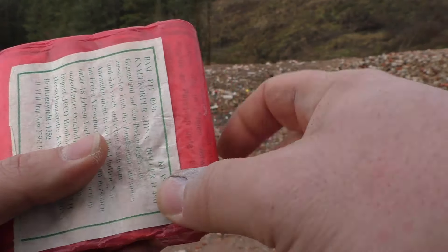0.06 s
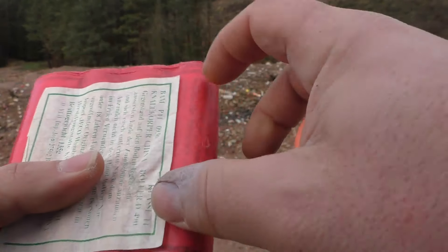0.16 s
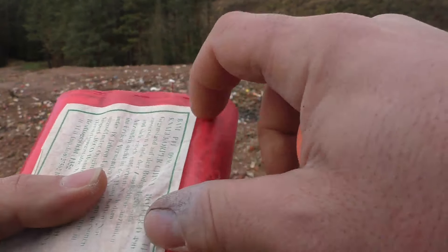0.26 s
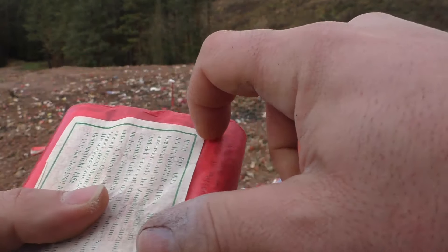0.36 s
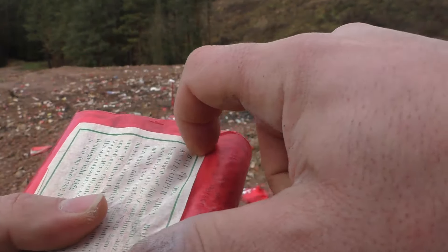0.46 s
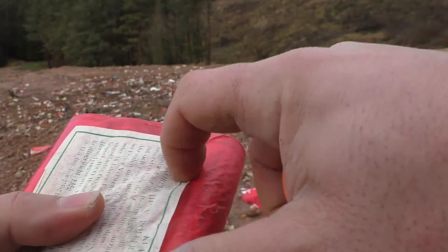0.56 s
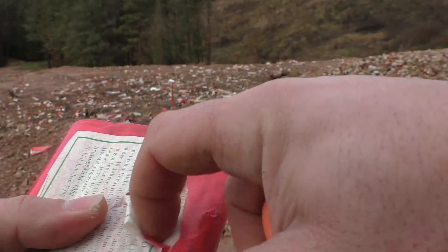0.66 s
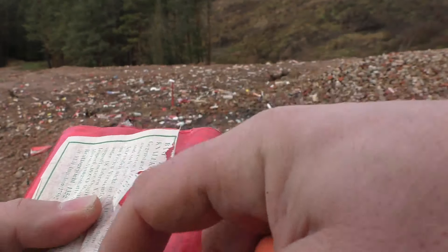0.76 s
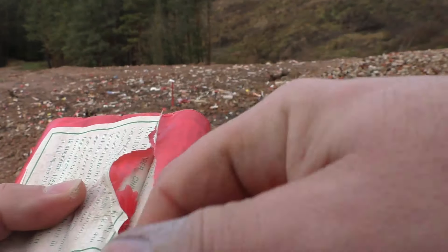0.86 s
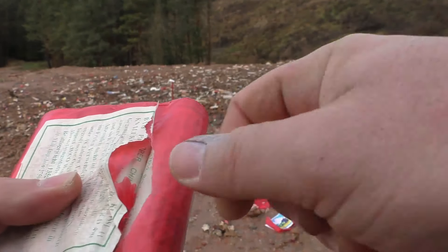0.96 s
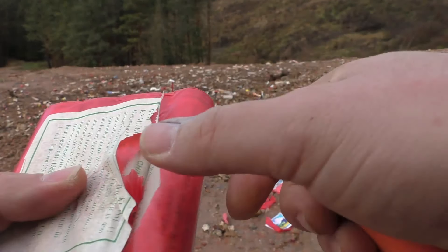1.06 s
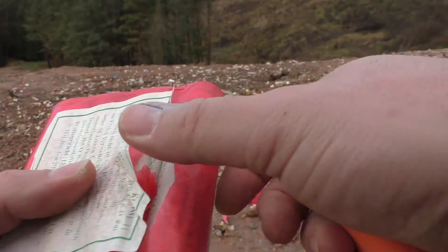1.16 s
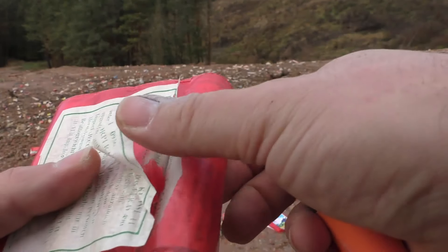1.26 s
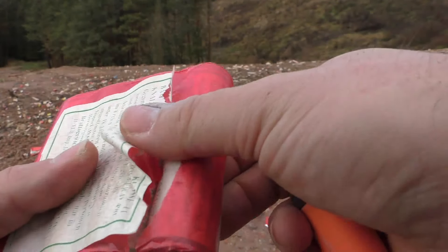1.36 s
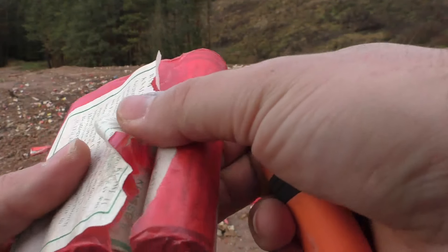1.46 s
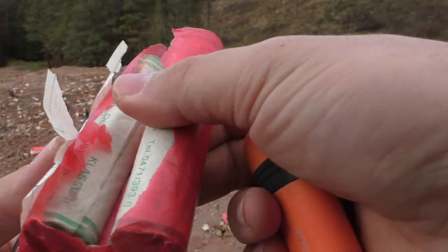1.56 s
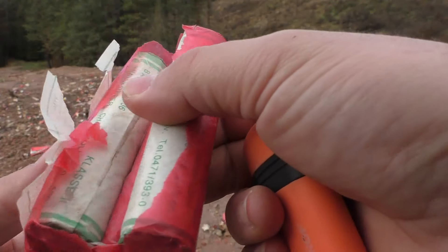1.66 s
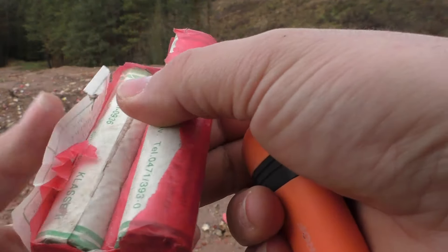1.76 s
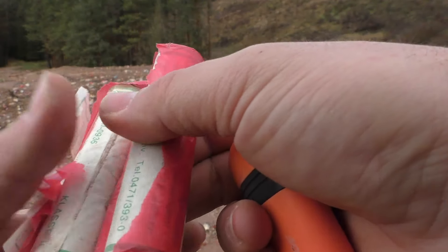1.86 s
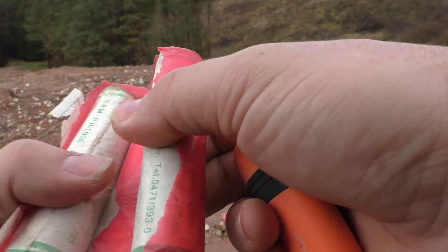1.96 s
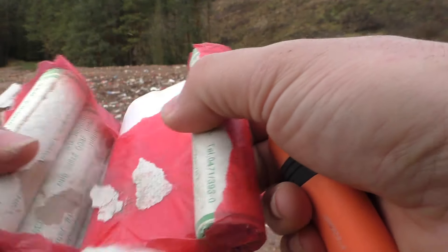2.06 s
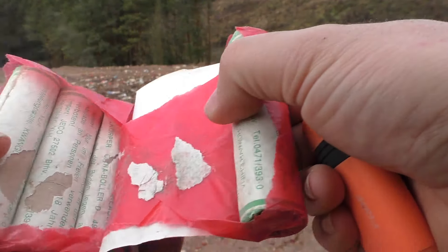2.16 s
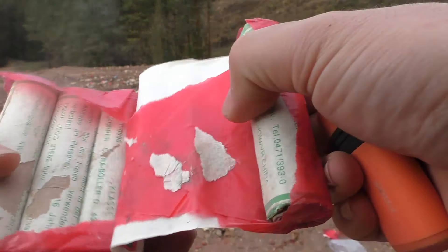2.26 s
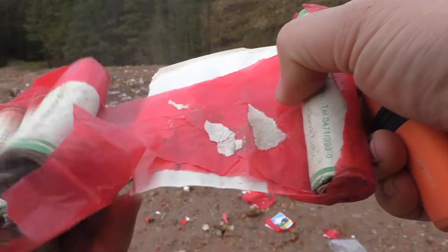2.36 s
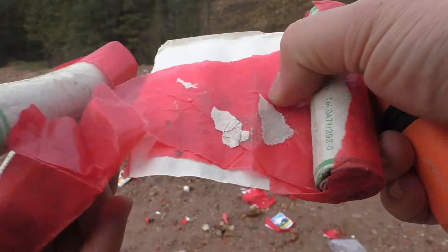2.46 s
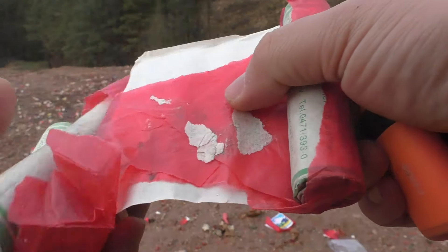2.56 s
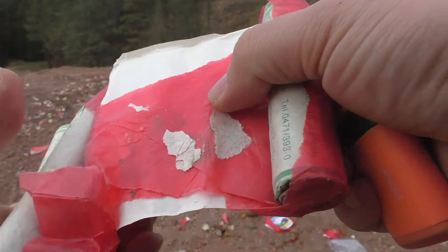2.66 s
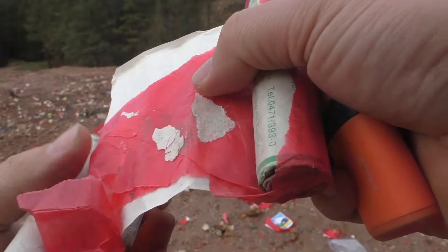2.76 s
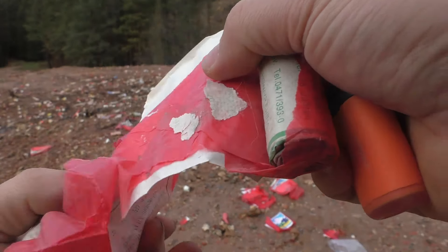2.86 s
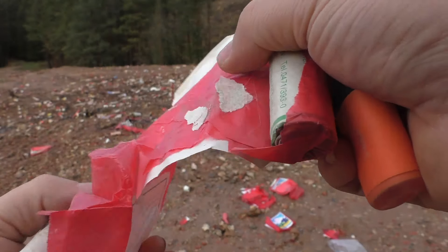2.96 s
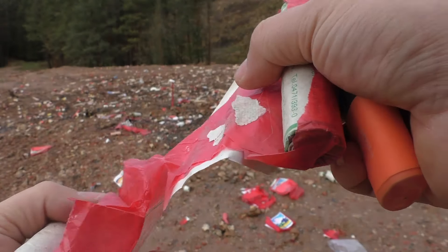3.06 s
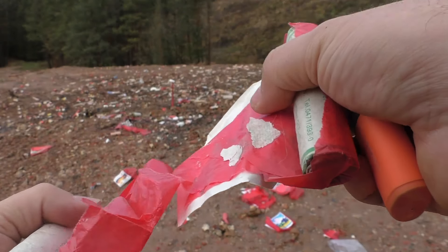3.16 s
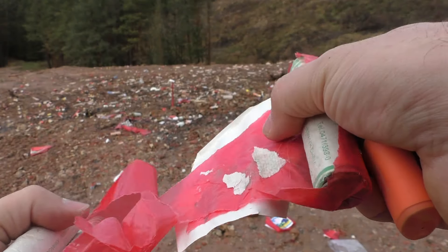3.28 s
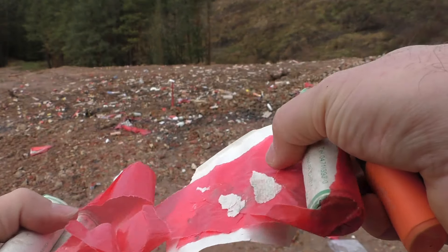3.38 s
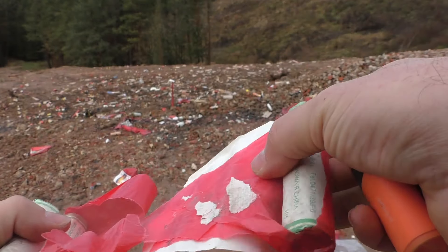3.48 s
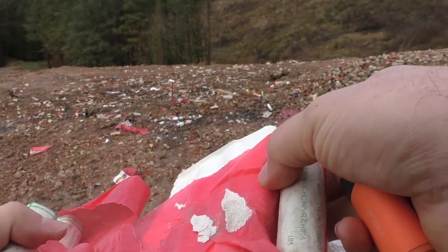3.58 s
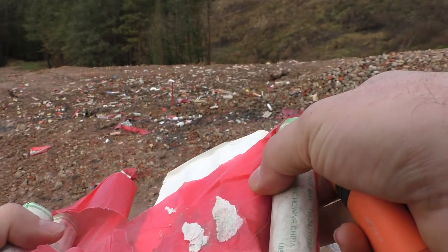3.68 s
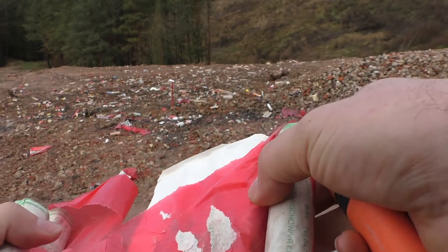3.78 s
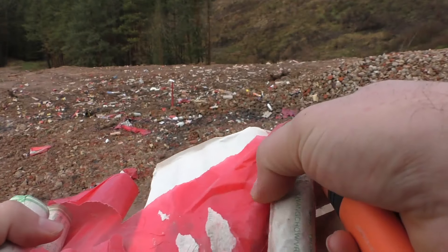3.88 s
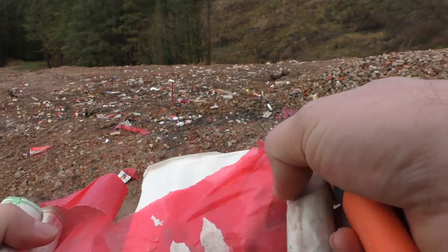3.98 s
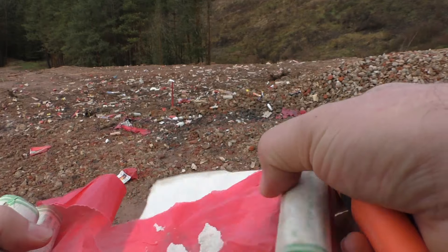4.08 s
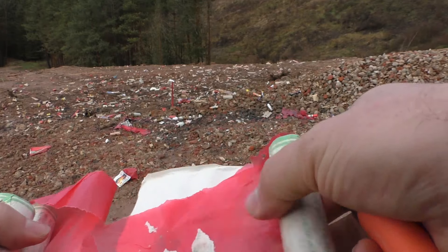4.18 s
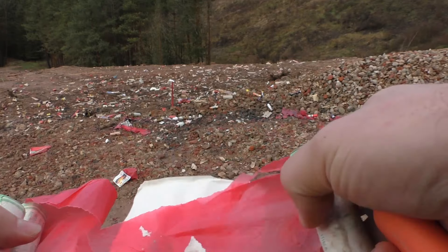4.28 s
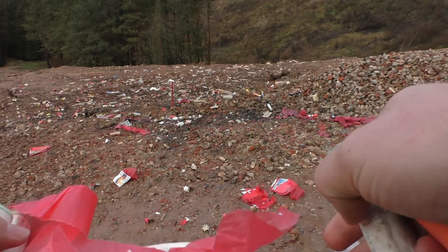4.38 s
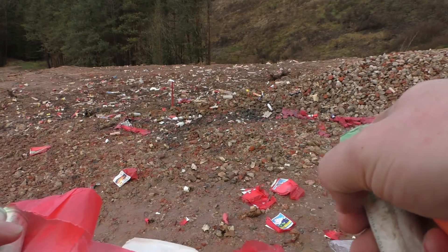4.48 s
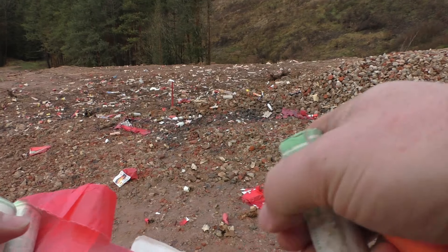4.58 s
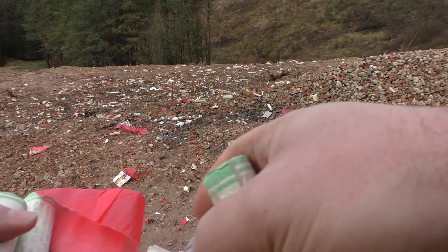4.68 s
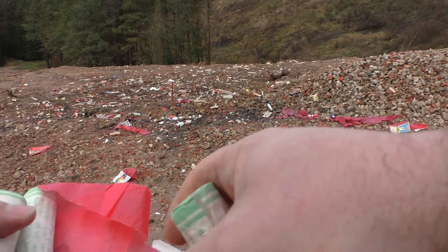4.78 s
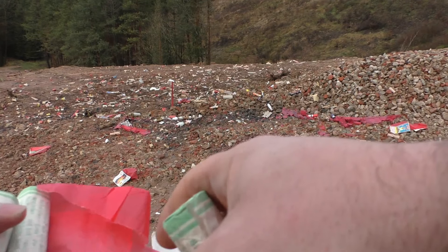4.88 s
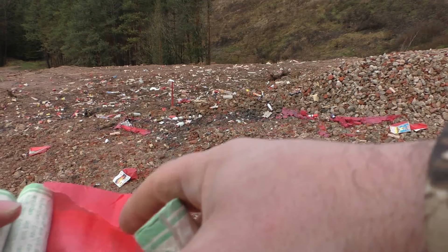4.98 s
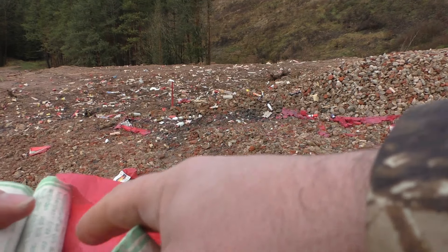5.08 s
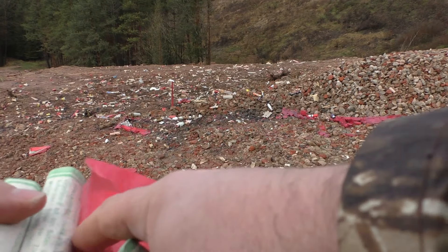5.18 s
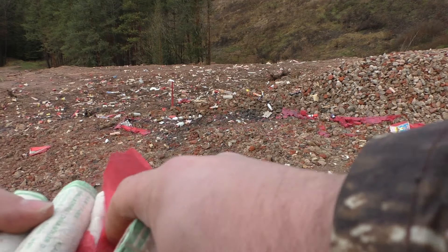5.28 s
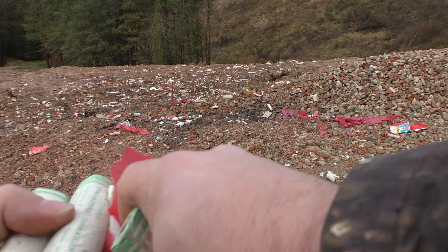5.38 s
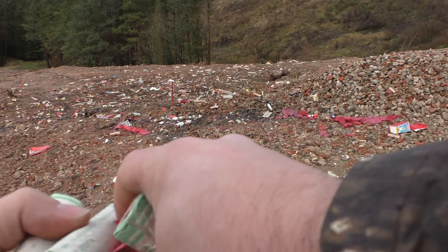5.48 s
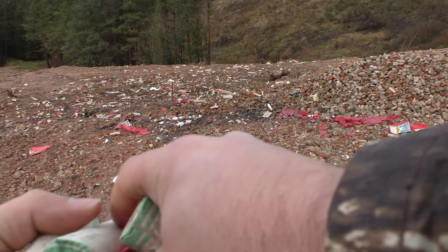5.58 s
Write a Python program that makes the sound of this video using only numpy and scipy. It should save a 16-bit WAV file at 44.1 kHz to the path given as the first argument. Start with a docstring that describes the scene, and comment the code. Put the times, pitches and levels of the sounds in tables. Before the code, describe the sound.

Hands rip crinkly paper from small card tubes in uneven bursts, loudest around two seconds, over a faint low open-air rumble.

```python
"""Paper wrapper torn off card tubes

Outdoors, hands tear and crumple a thin paper wrapper off a bundle of card tubes, close to a small stereo microphone.
Fibres and creases snap: clumped showers of clicks and noise patters, shaped by the swell and fade of each pull.
The sheet pops and flaps below them: slower showers in lower bands; damped sines knock and thump.
Behind lies a low rumble of open air: noise shaped in frequency, partly alike in both channels."""
import sys
import numpy as np
from scipy import signal
from scipy.fft import rfft, irfft, next_fast_len
from scipy.io import wavfile
from scipy.ndimage import uniform_filter1d

SR = 44100
rng = np.random.default_rng(int(sys.argv[2]) if len(sys.argv) > 2 else 0)


def store_pcm(level_fs):
    """Save levels as 16-bit WAV."""
    pcm = np.round(np.clip(level_fs, -1, 1) * 32767).astype(np.int16)
    wavfile.write(sys.argv[1], SR, np.atleast_2d(pcm).T)


N = 248283  # samples


def gain_of(db):
    """Decibels to an amplitude factor."""
    return 10 ** (np.asarray(db) / 20)


def evened(x):
    """Scales to rms 1."""
    return x / np.sqrt(np.mean(x ** 2) + 1e-20)


def read(points, hz):
    """Reads a spectral table on a log-frequency axis."""
    f, value = np.transpose(points)
    return np.interp(np.log(hz + 1), np.log(f + 1), value)


def colour(points):
    """Causal, minimum-phase impulse response of a spectrum, energy 1, so only the table's shape counts."""
    hz = abs(np.fft.fftfreq(4096, 1 / SR))
    log_gain = np.log(gain_of(np.maximum(read(points, hz), -70)))
    phase = -signal.hilbert(log_gain).imag
    taps = np.fft.ifft(np.exp(log_gain + 1j * phase)).real[:2048]
    return taps / np.linalg.norm(taps)


def wander(seconds):
    """Random drift that changes over the given time, rms 1."""
    width = max(round(seconds * SR), 2)
    drift = uniform_filter1d(rng.standard_normal(N), width)
    return evened(uniform_filter1d(drift, width))


def add(mix, s, sound):
    """Mixes a sound in at a time in seconds, cut at the end of the mix."""
    part = mix[round(s * SR):][:len(sound)]
    part += sound[:len(part)]


# open air behind the paper, spectral shape: (f/Hz, relative level/dB)
AIR_SPECTRUM = [(15, -36), (25, -5), (76, 11), (309, -4.5), (373, -0.5), (416, -9), (1520, -16),
                (3340, -38), (7920, -99.5), (16000, -113)]
# likeness of the air at left and right: (f/Hz, correlation, limited to -1..1)
AIR_LIKENESS = [(60, 0.82), (240, 0.7), (950, 0.17), (3770, -1.1), (15000, -0.08)]
# lean of the stereo microphone, for air and paper alike: (f/Hz, left minus right level/dB)
PORT_LEAN = [(60, 1.5), (150, 2.8), (300, 1.5), (700, .5), (8000, .7), (15000, -.2)]
AIR_DB = -49  # rms over both channels


def air():
    """Distant rumble: noise spectra that swell gently in patches of time and frequency."""
    frames, hz = N // 256 + 5, np.fft.rfftfreq(1024, 1 / SR)
    a, b, c, d, patches = rng.standard_normal((frames, 513, 5)).T
    patches = uniform_filter1d(patches, 10, axis=0)
    patches = evened(uniform_filter1d(patches, 16, axis=1))
    same = np.clip(read(AIR_LIKENESS, hz), -1, 1)[:, None]
    left, stranger = a + 1j * b, c + 1j * d
    right = same * left + np.sqrt(1 - same ** 2) * stranger
    lean_db = np.multiply.outer([.5, -.5], read(PORT_LEAN, hz))[..., None]
    spectra = np.array([left, right])
    spectra *= gain_of(read(AIR_SPECTRUM, hz)[:, None] + 0.8 * patches + lean_db)
    sound = signal.istft(spectra, nperseg=1024, noverlap=768)[1][:, :N]
    return gain_of(AIR_DB) * evened(sound)


# fingers never quite rest on the paper: (t/s, crackle level/dB)
FIDGETING = [(0, -66), (0.5, -59), (0.9, -65.5), (1.15, -58), (1.35, -59), (1.6, -56.5), (1.825, -66),
             (2.6, -47), (3.15, -55), (4.3, -62), (4.65, -51.5), (5.08, -55), (5.3, -49), (5.63, -56)]
FIDGET_POP_DB, FIDGET_FLAP_DB, FIDGET_RIP_DB = 9, 0.5, -24  # relative to its crackle
# pulls of the hands: (full strength t/s, swell/s, hold/s, fade/s, crackle level/dB,
#                      sheet pops above crackle/dB, tearing from 0 crumple to 1 rip)
HAND_PULLS = [(0.031, 0.064, 0.01, 0.12, -37, -5, 0.44), (0.15, .05, 0.0047, .03, -48.5, -4, 1),
              (0.304, 0.064, 0.026, 0.2, -37.5, -2, 0.94), (0.492, .03, 0.038, 0.037, -49, 1, 1),
              (0.587, 0.034, 0.11, 0.14, -23.5, -11.5, 0.55), (1.385, 0.0084, 0.11, 0.027, -39, 0, 1),
              (1.536, 0.035, 0.013, .045, -24.5, -6.5, 0.86), (1.724, 0.24, 0.024, 0.071, -43.5, 4.5, 1),
              (1.865, .025, .05, 0.033, -44.5, 2, 0.65), (1.968, 0.056, 0.065, 0.021, -24, 3, 0.86),
              (2.042, 0.029, 0.075, 0.067, -18, 3.5, 0.53), (2.186, 0.045, 0.0092, 0.054, -29.5, 0.5, 0),
              (2.283, 0.031, 0.075, 0.18, -20, 0, 0.15), (2.49, 0.22, 0, 0.39, -29, 2, 0.3),
              (2.838, .11, 0.022, 0.16, -33.5, 5.5, 0.64), (3.098, 0.6, 0, 0.032, -45, 7.5, .5),
              (3.29, 0.18, 0, 0.12, -36, 2.5, 0.26), (3.4, 0.037, 0.0027, 0.069, -35.5, 1, 0.27),
              (3.51, 0.1, 0, 0.64, -31, 0.5, 0.32), (3.7, 0.061, 0.00099, 0.027, -37.5, 6, 0.012),
              (3.764, 0.011, 0.022, .02, -29.5, -8.5, 0), (3.856, 0.054, 0.078, 0.02, -31, 0.5, 0.11),
              (3.924, .015, 0.025, 0.24, -21.5, 1.5, 0.18), (4.109, 0.12, 0.019, 0.13, -32, 2.5, 0.39),
              (4.23, 0.071, 0.019, 0.16, -27, 0.5, 0.22), (4.69, 0.074, 0, 0.034, -45.5, 10, 0.067),
              (4.78, 0.47, 0.084, 0.5, -51, 6.5, 0), (4.99, 0.043, 0.0069, 0.023, -42, 11.5, 0.15),
              (5.166, 0.03, 0.018, 0.044, -35, 6, 0.24), (5.24, .08, .01, .08, -36, 4.5, 0.5),
              (5.342, 0.11, 0.012, 0.084, -34.5, 1.5, 0.32), (5.407, .05, 0.019, 0.035, -37, 4.5, 0.2),
              (5.45, 0.033, 0.024, 0.066, -32.5, 1, 0.41), (5.553, 0.11, 0.02, 0.046, -42.5, 7.5, 0.26),
              (5.63, 0.017, 0, .05, -32, 8.5, 0.86)]
SLOPE_DB = 20  # the crackle climbs this much in one swell time and drops it in one fade time
SHEET_FOLLOWS = 0.99  # panels and flaps swell and fade almost exactly as steeply as the fibres
FLAP_DB, RIP_DB = (-4.5, -21), (-11, 2.5)  # flaps above pops, rip above crackle: (crumpling, tearing)


def strength():
    """Envelopes of crackle, pops, flaps and rip: pulls swell, hold and fade; the loudest pull or the fidgeting rules."""
    t = np.arange(0, N + 64, 64)[:, None] / SR
    s, swell, hold, fade, pull_db, pop_db, tear = np.transpose(HAND_PULLS)
    early, late = np.maximum(s - t, 0), np.maximum(t - s - hold, 0)
    drop_db = SLOPE_DB * (early / swell + late / fade)
    flap_db, rip_db = (crumple + (rip - crumple) * tear for crumple, rip in (FLAP_DB, RIP_DB))
    crackle_db = pull_db - drop_db
    sheet_db = pull_db + pop_db - SHEET_FOLLOWS * drop_db
    layers_db = (crackle_db, sheet_db, sheet_db + flap_db, crackle_db + rip_db)
    idle_db = np.interp(t[:, 0], *np.transpose(FIDGETING))
    envelopes = []
    for db, above_db in zip(layers_db, (0, FIDGET_POP_DB, FIDGET_FLAP_DB, FIDGET_RIP_DB)):
        gain = gain_of(np.maximum(db.max(1), idle_db + above_db))
        envelopes.append(np.interp(np.arange(N) / SR, t[:, 0], gain)[:, None])
    return envelopes


def shower(per_s, spread_db, clump_db, rattle_s, count):
    """Clicks of uneven size, clumped in time; each of the count places on the sheet rattles in its own way."""
    size = gain_of(spread_db * np.minimum(rng.exponential(1, N), 4.5))
    size = size * (rng.random(N) < per_s / SR)
    size = size * gain_of(clump_db * wander(0.0048) + clump_db * wander(0.02))
    # level out the slow swells so that the crackle stays fairly steady
    local_power = uniform_filter1d(uniform_filter1d(size ** 2, 1500), 1500)
    size = size / (local_power + 1e-3 * local_power.mean()) ** .4
    place, t = rng.integers(0, count, N), np.arange(600) / SR
    rattle = rng.standard_normal((count, 600)) * np.exp(-t / rattle_s)
    rattle /= np.linalg.norm(rattle, axis=1, keepdims=True)
    places = [signal.oaconvolve(size * (place == k), rattle[k])[:N] for k in range(count)]
    return evened(np.array(places).T) / np.sqrt(count)


def rubbing():
    """Skin sliding on paper: dull, unsteady noise at one of the six places."""
    rub = rng.standard_normal((N, 1)) * gain_of(10.0 * wander(0.006))[:, None]
    rub = rub * np.eye(6)[3]
    return signal.lfilter(*signal.butter(2, 8000, fs=SR), rub, axis=0)


TICK_EVERY_S = .025  # one tick at a random moment of each such slot
TICK_DB, TICK_SPREAD_DB = -2.5, 1  # offset, plus or minus the spread
TICK_FOLLOWS = 0.76  # below 1, so ticks stand out most in light handling
TICK_T60_S = 0.0043  # times 0.5 to 1.5, before the shortest snap time applies


def ticks(crackle):
    """Lesser creases: they let go at uneven moments, harder the harder the paper is worked."""
    slots = np.arange(0, N / SR - TICK_EVERY_S, TICK_EVERY_S)
    when, size, ring = rng.random((len(slots), 3)).T
    s = slots + TICK_EVERY_S * when
    crackle_db = 20 * np.log10(crackle[(s * SR).astype(int), 0])
    db = TICK_FOLLOWS * crackle_db + TICK_DB + TICK_SPREAD_DB * (2 * size - 1)
    return list(zip(s, db, TICK_T60_S * (.5 + ring)))


# single creases that give way: (t/s, rms level at its height/dB, dying time t60/s, at least 0.004)
CREASE_SNAPS = [(0.0227, -23, 0.011), (0.0552, -25.5, 0.012), (0.0993, -40, 0.0066), (0.1282, -34, 0.012),
                (0.168, -32.5, 0.0073), (0.201, -23.5, 0.0035), (0.264, -27, 0.0047),
                (0.3085, -21.5, 0.012), (0.332, -26, 0.0066), (0.361, -33, .011), (0.3844, -20, 0.0039),
                (0.3993, -22.5, 0.0047), (0.4148, -25.5, .012), (0.4446, -26.5, 0.0099),
                (0.4894, -22.5, .0075), (0.499, -25, 0.0065), (0.5077, -30, 0.02), (0.5277, -33, 0.0091),
                (0.5701, -12.5, 0.013), (0.5873, -15.5, .013), (0.613, -16.5, 0.036), (0.636, -13, 0.0078),
                (0.6534, -21, 0.036), (0.6742, -33, 0.046), (0.6993, -28, 0.052), (0.7424, -19, 0.15),
                (0.7659, -25, .042), (0.78, -27, 0.13), (0.8182, -26, 0.04), (0.8415, -29, .008),
                (0.8595, -32, 0.004), (0.8893, -35, 0.024), (0.977, -48.5, 0.011), (1.007, -50, .006),
                (1.0293, -36, .008), (1.0648, -30, 0.0051), (1.0857, -38, .008), (1.1042, -31, 0.0039),
                (1.1553, -44, 0.0061), (1.177, -44, 0.0053), (1.184, -31.5, 0.0054), (1.2085, -26, 0.0077),
                (1.2342, -28, 0.006), (1.253, -39, 0.0068), (1.307, -27.5, 0.0071), (1.342, -37, .017),
                (1.3735, -29, 0.011), (1.3897, -30, 0.0067), (1.4206, -20.5, 0.019), (1.4429, -17, 0.0096),
                (1.4808, -26, 0.037), (1.5149, -12.5, 0.05), (1.6165, -28.5, 0.012), (1.7094, -23, 0.023),
                (1.719, -21, 0.015), (1.7292, -19.5, 0.009), (1.7448, -22, 0.0043), (1.7651, -21.5, 0.0037),
                (1.7742, -34, 0.013), (1.7834, -33, 0.0089), (1.8412, -33, 0.02), (1.8553, -29, 0.0067),
                (1.8709, -30.5, .008), (1.8976, -20.5, 0.0067), (2.0367, -11, 0.0037),
                (2.2018, -17.5, 0.0088), (2.2241, -24, 0.016), (2.2362, -21, 0.0081), (2.2602, -25, .016),
                (2.489, -14, 0.0078), (2.519, -18, 0.011), (2.532, -15.5, 0.016), (2.6027, -25, 0.012),
                (2.6212, -23, 0.015), (2.7063, -32, 0.017), (2.7207, -21, 0.0041), (2.7695, -32, 0.015),
                (2.7816, -22.5, 0.0097), (2.8355, -20.5, 0.014), (2.9167, -26.5, 0.078),
                (2.9697, -21.5, 0.0053), (2.986, -29, .007), (2.9961, -38, 0.0085), (3.016, -33.5, 0.023),
                (3.037, -27.5, 0.012), (3.0545, -23.5, 0.009), (3.0978, -44, 0.011), (3.2202, -32, 0.031),
                (3.2371, -21.5, 0.0073), (3.4433, -22, 0.0037), (3.5407, -23, 0.014),
                (3.5737, -22.5, 0.068), (3.594, -18, 0.0038), (3.611, -27, .015), (3.637, -17, 0.0048),
                (3.6969, -21, 0.02), (3.711, -17, 0.0034), (3.759, -14.5, 0.0033), (3.7953, -18.5, .007),
                (3.8216, -25.5, 0.013), (3.849, -21.5, 0.0083), (3.8796, -16.5, 0.0046),
                (3.922, -17, 0.0084), (3.932, -20, 0.012), (3.9445, -10, 0.023), (4.001, -18, 0.017),
                (4.02, -22, 0.021), (4.054, -18, 0.021), (4.079, -18, .008), (4.1511, -17, 0.0077),
                (4.2, -22, 0.016), (4.2494, -21, 0.039), (4.311, -23, .023), (4.376, -26, .023),
                (4.3909, -41, 0.0089), (4.4508, -30.5, 0.0074), (4.489, -31, 0.0086), (4.5288, -31, 0.0036),
                (4.5414, -29, 0.0098), (4.565, -35, 0.0086), (4.5841, -50, 0.0054), (4.5978, -39, 0.0091),
                (4.614, -35, 0.011), (4.631, -26, 0.0087), (4.6458, -31, .017), (4.6882, -24, 0.032),
                (4.746, -38, .014), (4.7821, -35, 0.016), (4.833, -42, .02), (4.877, -31.5, .014),
                (4.9911, -33, 0.016), (5.1132, -39, 0.015), (5.132, -25, 0.0086), (5.158, -26, 0.027),
                (5.1759, -20, 0.015), (5.2247, -25, 0.0054), (5.34, -26.5, 0.021), (5.396, -28, .02),
                (5.4257, -21, 0.0079), (5.4984, -24, 0.0047), (5.5462, -27, 0.014), (5.563, -33.5, .015)]
SNAP_TILT = .6  # each crease is duller or brighter than the next
SNAP_POP_DB, SNAP_POP_FOLLOWS = -14.5, 0.83  # sheet pop under each snap, relatively less under hard ones
SNAP_POP_SPREAD_DB = 3.5  # times -1.5 to 0.5 at random


def snaps(crackle, count):
    """Each crease lets go in a quick swelling and dying patter; returns the drive of fibres and of panels."""
    out, t = np.zeros((2, count, N)), np.arange(3000) / SR
    for s, snap_db, t60 in list(CREASE_SNAPS) + ticks(crackle):
        jolts, chance = rng.standard_normal((2, 3000)), rng.random(3000)
        t60, place = max(t60, .004), int(chance[0] * count)
        shape = gain_of(-60 * t / t60) * (1 - np.exp(-t / min(0.02 * t60, .0012)))
        shape /= shape.max()
        lumps = uniform_filter1d(1. * (chance < .02), size=14)  # fibres part in lumps
        patter = shape * jolts * (1 + 3.3 * lumps)
        patter[0, 1:] += SNAP_TILT * (2 * chance[1] - 1) * patter[0, :-1]
        patter *= np.linalg.norm(shape) / np.linalg.norm(patter, axis=1, keepdims=True)
        pop_db = SNAP_POP_FOLLOWS * snap_db + SNAP_POP_DB + SNAP_POP_SPREAD_DB * (2 * chance[2] - 1.5)
        add(out[0, place], s, gain_of(snap_db) * patter[0])
        add(out[1, place], s, gain_of(pop_db) * patter[1])
    return out.transpose(0, 2, 1)


# panels and tubes that knock with a pitch: (t/s, level/dB, starting f/Hz)
PITCHED_KNOCKS = [(0.0922, -32, 1350), (0.314, -23.5, 1720), (0.3448, -21.5, 1500), (0.3914, -24.5, 1600),
                  (0.4982, -29, 1010), (0.569, -29, 220), (0.6325, -17, 790), (1.1025, -29.5, 1120),
                  (1.184, -33.5, 1310), (1.254, -29.5, 415), (1.306, -31.5, 1960), (1.4223, -23, 1830),
                  (1.4864, -25, 950), (1.726, -22.5, 1790), (1.9017, -18.5, 1960), (2.0134, -2.5, 1100),
                  (2.0376, -2, 246), (2.1345, -14.5, 2150), (2.1977, -16.5, 895), (2.2245, -19, 840),
                  (2.2357, -26, 1440), (2.261, -16.5, 930), (2.2777, -12.5, 291), (2.3164, -17.5, 408),
                  (2.352, -13, 1350), (2.5286, -17, 1230), (2.637, -22, 1090), (2.9278, -19, 1480),
                  (3.098, -18.5, 1900), (3.2881, -25, 620), (3.4432, -25, 1000), (3.5166, -26, 473),
                  (3.6942, -24, 1040), (3.7391, -24, 922), (3.7649, -21.5, 1130), (3.823, -25, 1140),
                  (3.8509, -19.5, 970), (3.9224, -13.5, 930), (3.9481, -12.5, 457), (3.9894, -19, 343),
                  (4.003, -9, 665), (4.0216, -12.5, 1240), (4.0534, -26, 530), (4.2525, -18.5, 228),
                  (4.5339, -28, 1600), (4.599, -31, 1240), (4.6147, -25, 1150), (4.6314, -24.5, 1740),
                  (4.6709, -29, 1040), (4.691, -21, 760), (4.7835, -28.5, 1460), (4.8775, -26.5, 575),
                  (4.991, -28, 1190), (5.1775, -17.5, 517), (5.248, -25.5, 377), (5.3042, -26, 2200),
                  (5.348, -23, 2180), (5.427, -21, 1120)]
SLAP_DB, SLAP_T60_S = -10.5, 0.0091  # each knock starts with a dull slap, relative to its ring


def knocks():
    """Short damped rings that sag in pitch, the low ones lasting longer, each with a slap of smoothed noise."""
    out, t = np.zeros(N), np.arange(4000) / SR
    for s, db, hz in PITCHED_KNOCKS:
        t60 = 0.012 + 2.2 / hz
        ring = np.sin(2 * np.pi * hz * t * (1 - 6 * t)) * (1 - np.exp(-t / 0.00015))
        slap = evened(uniform_filter1d(rng.standard_normal(4000), size=9))
        add(out, s, gain_of(db - 60 * t / t60) * ring)
        add(out, s, gain_of(db + SLAP_DB - 60 * t / SLAP_T60_S) * slap)
    return out


# air shoved at the microphone by hard pulls: (t/s, level/dB, f/Hz)
AIR_THUMPS = [(2.084, -13.5, 161), (2.279, -21, 247), (2.346, -18.5, 65), (2.617, -31, 57.3),
              (3.927, -29, 170), (4.038, -20.5, 252)]


def thumps():
    """Slow swings of air: sines that die to 1/e within 0.82 of a cycle."""
    out, t = np.zeros(N), np.arange(4000) / SR
    for s, db, hz in AIR_THUMPS:
        add(out, s, gain_of(db) * np.sin(2 * np.pi * hz * t) * np.exp(-hz * t / 0.82))
    return out


# phase between the microphone's ports: (f/Hz, left lead/rad, before each direction's turn factor)
PORT_LEAD = [(0, 0), (4650, .2), (6550, .9), (9470, 1.5), (12100, 2.0), (16300, 3.1)]


def ports(sounds, turns, lean_db):
    """Sounds from different directions reach the two ports with more or less of the phase lead and of the level."""
    size = next_fast_len(N + 512)
    hz = np.fft.rfftfreq(size, 1 / SR)[:, None]
    half = np.exp(.5j * read(PORT_LEAD, hz) * turns) * gain_of((read(PORT_LEAN, hz) + lean_db) / 2)
    # treble bounces off the hands, differently to each port
    lag_s = rng.uniform(0.000308, 0.00153, (2, 1, len(turns)))
    bounce = 1 + 0.28 * hz / (hz + 3000) * np.exp(-2j * np.pi * hz * lag_s)
    spectra = rfft(sounds, size, axis=0)
    both = np.array([spectra * half, spectra / half]) * bounce
    return irfft(both.sum(2), size)[:, :N]


# spectral shapes at the microphone, each: (f/Hz, relative level per Hz/dB)
FIBRE_SPECTRUM = [(2650, -20.5), (4500, -22.5), (5600, -7.5), (6600, -4.5), (7900, 0.5), (9200, -3.5),
                  (10100, -11), (10600, -24.5), (11300, -9.5), (13200, -3.5), (15200, -8), (16000, -9)]  # snapping fibres
RIP_SPECTRUM = [(1500, -14.5), (2400, -3.5), (3300, -10.5), (4500, -10), (6000, -8)]  # the tearing edge
SHEET_SPECTRUM = [(260, -28.5), (500, -6), (700, -1.5), (1100, -0.5), (1900, -2.5), (2500, -9),
                  (3200, -19.5), (4500, -27), (6000, -49)]  # popping panels of paper
FLAP_SPECTRUM = [(20, -41), (60, -11), (170, -1), (320, 4.5), (550, 2), (900, -19.5)]  # air pushed by the sheet


def paper():
    """Several sizes of release share the same pull: fibres, the tearing edge, panels and the whole sheet."""
    crackle, pop, flap, rip = strength()
    fibres = shower(per_s=4000, spread_db=3.5, clump_db=2.0, rattle_s=0.00066, count=6)
    edge = shower(per_s=2500, spread_db=2.5, clump_db=3.5, rattle_s=0.0005, count=6)
    panels = shower(per_s=2200, spread_db=3.5, clump_db=2.0, rattle_s=0.0014, count=6)
    pushes = shower(per_s=300, spread_db=3.5, clump_db=0.5, rattle_s=0.0019, count=6)
    # a parting fibre also kicks what lies beside it
    edge = 0.18 * fibres + 0.76 * edge
    panels = 0.13 * fibres + 0.58 * panels
    fine, coarse = snaps(crackle, count=6)
    # in light handling a soft, dull rub replaces the fibre shower; ticks carry on over it
    gentle = 1 / (1 + (crackle / gain_of(-52)) ** 3)
    fibres = 0.75 * gentle * rubbing() + np.clip(1 - 1.74 * gentle, 0, 1) * fibres
    torn_snaps = 0.19 * fine * (rip / crackle) ** .3
    layers = ((fibres * crackle + fine, FIBRE_SPECTRUM), (edge * rip + torn_snaps, RIP_SPECTRUM),
              (panels * pop + coarse, SHEET_SPECTRUM), (pushes * flap, FLAP_SPECTRUM))
    sound = sum(signal.oaconvolve(x, colour(shape)[:, None], axes=0)[:N] for x, shape in layers)
    sound[:, 2] += knocks() + thumps()
    lean_db = np.array([2.0, 0.85, -0.22, -0.85, -1.2, 0.93])
    return ports(sound, turns=np.linspace(.3, 1.5, 6), lean_db=lean_db)


def scene():
    """Paper in the hands, close to the microphone, over the open air."""
    return paper() + air()


EDGE_HZ = 15900  # upper band limit


def record(dry):
    """The microphone drops the deepest bass, the converter clips at full scale; then the band limit."""
    thinned = signal.lfilter(*signal.butter(2, 32, "high", fs=SR), dry)
    clipped = np.clip(thinned, -1, 1)
    lowpass = signal.firwin(511, EDGE_HZ, window=("kaiser", 9), fs=SR)
    return signal.oaconvolve(clipped, lowpass[None], "same")


dry = scene()
out = record(dry)
store_pcm(out)
```